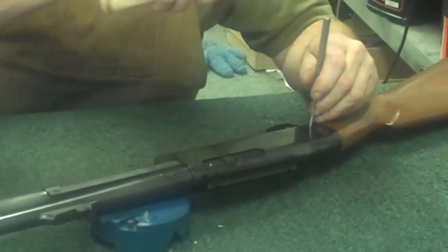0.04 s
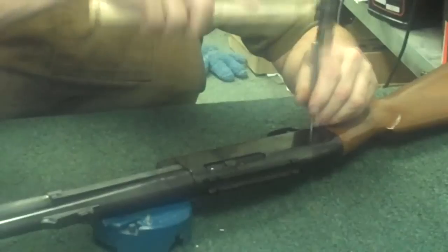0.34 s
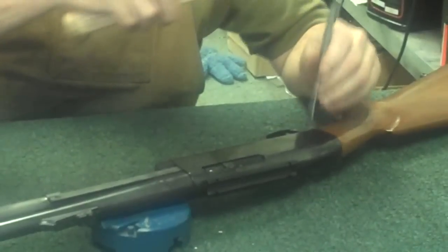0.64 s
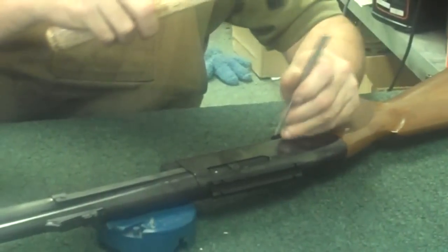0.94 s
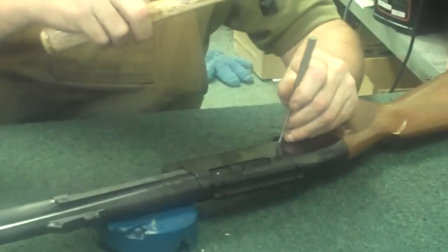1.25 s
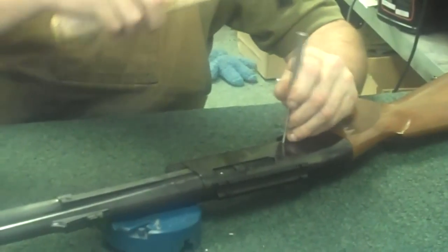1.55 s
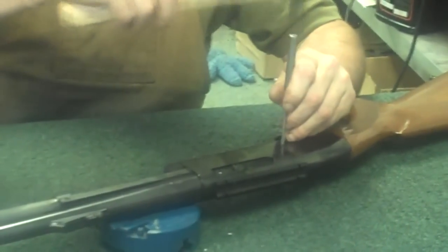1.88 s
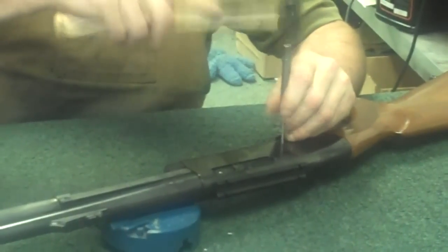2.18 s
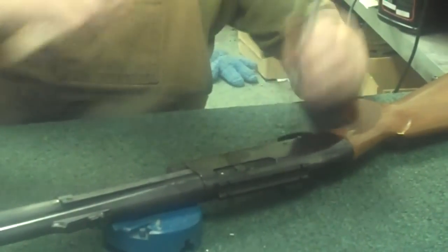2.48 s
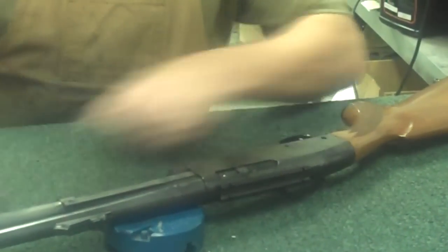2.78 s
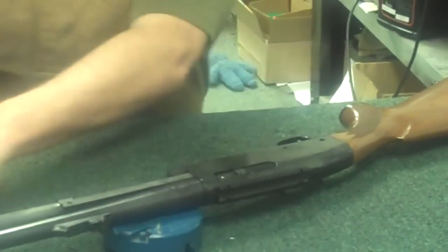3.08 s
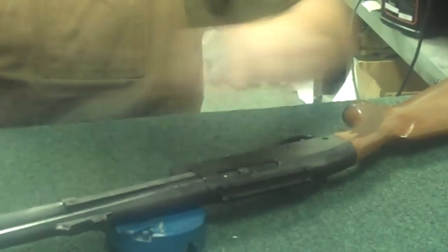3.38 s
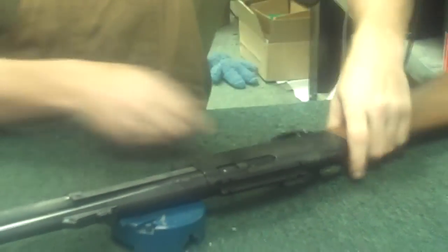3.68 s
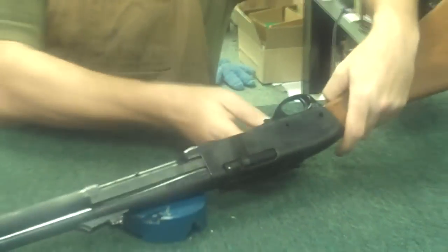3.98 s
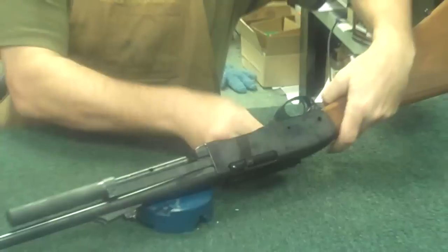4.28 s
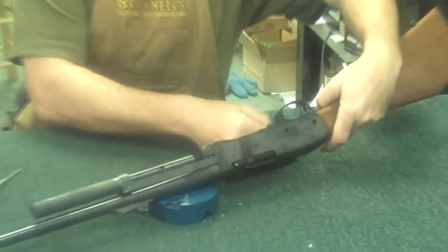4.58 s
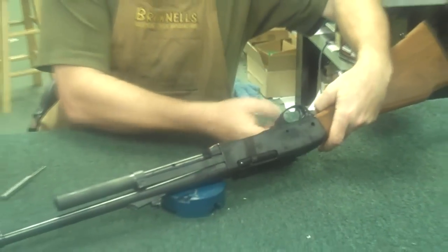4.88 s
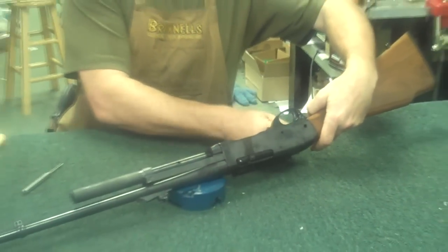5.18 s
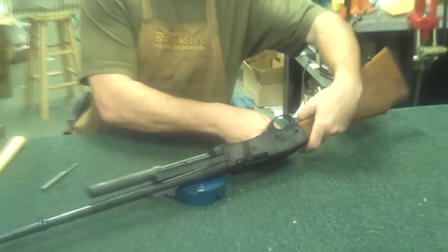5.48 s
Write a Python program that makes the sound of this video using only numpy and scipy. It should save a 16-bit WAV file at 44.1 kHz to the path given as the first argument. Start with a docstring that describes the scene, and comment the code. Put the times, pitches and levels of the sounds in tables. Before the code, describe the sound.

Close, ringing hammer taps on a metal punch, two then three, followed by light clicks from a rifle's loose parts being handled.

```python
"""A padded bench in a small workshop, microphone close to a rifle receiver; sleeves rustle over room noise.
Steel is still ringing as a hammer strikes a punch twice to drive out the pins: each blow knocks the gun,
rebounds and rings the punch. Near 2 s come three more blows, the first setting a loose part chattering.
From about 3 s the gun is lifted: it bumps the pad, its loose action clicks and a catch snaps twice.
Throughout, the camera's gain control ducks at the loud blows and creeps back."""
import sys
import numpy as np
from scipy import signal
from scipy.fft import rfft, irfft, next_fast_len
from scipy.io import wavfile
from scipy.ndimage import uniform_filter1d, map_coordinates

SR = 44100
rng = np.random.default_rng(int(sys.argv[2]) if len(sys.argv) > 2 else 0)


def unload_wav(signal):
    """Save mono or channel-first audio to the path in sys.argv[1] as 16-bit WAV at rate SR, clipped to [-1, 1]."""
    wavfile.write(
        sys.argv[1],
        SR,
        np.round(np.clip(np.atleast_2d(signal).T, -1, 1) * 32767).astype(np.int16),
    )


N = 253134
TIME = np.arange(N) / SR
AGE = np.arange(SR // 2) / SR  # seconds since a contact


def amp(db):
    """Decibels to gain."""
    return 10 ** (np.asarray(db) / 20)


def unit(x):
    """x at rms 1."""
    return x / np.sqrt(np.mean(x ** 2) + 1e-20)


def along(points, hz):
    """Read (freq_hz, value) points on a log frequency axis."""
    freqs, values = np.transpose(points)
    return np.interp(np.log(hz + 1), np.log(freqs), values)


def filtered(x, gain):
    """x times a gain that depends on frequency."""
    size = next_fast_len(len(x) + 8192)
    return irfft(rfft(x, size) * gain(np.fft.rfftfreq(size, 1 / SR)), size)[:len(x)]


def noise(spectrum, size, tilt_db=0):
    """Noise of rms 1 with the given spectrum, tilted by tilt_db per octave above 1 kHz."""
    def gain(hz):
        return amp(along(spectrum, hz) + tilt_db * np.log2(np.maximum(hz / 1000, 1)))
    return unit(filtered(rng.standard_normal(size), gain))


def wobble(rate, size):
    """A smooth random curve with rate knots a second."""
    knots = np.random.default_rng(rng.integers(2 ** 31)).standard_normal(int(size * rate / SR) + 4)
    return map_coordinates(knots, [np.arange(size) * rate / SR])


def fade(t60):
    """A decay that loses 60 dB in t60 seconds."""
    return amp(-60 * AGE / max(t60, 1e-3))


def ring(modes, blur, rate):
    """Decaying modes whose phases wander, as those of parts that chatter against each other."""
    return sum(amp(db) * fade(t60) * np.sin(2 * np.pi * hz * AGE + blur * wobble(rate, len(AGE)))
               for hz, db, t60 in modes)


def add(track, start_s, sound):
    """Mix a sound into the track at start_s."""
    part = track[max(round(start_s * SR), 0):][:len(sound)]
    part += sound[:len(part)]


# Noise of the shop, all around the microphone: freq_hz, level_db
AIR_SPECTRUM = [(20, 6.5), (35, -3.5), (70, -5), (130, -9.5), (200, -3.5), (270, -7.5), (420, -11),
                (700, -8.5), (1400, -10.5), (3000, -18.5), (7000, -26.5), (14000, -32.5)]
# Faint hum in the shop: pitch_hz, level_db
HUM_TONES = [(120, -80.5), (190, -78.5), (362, -79)]


def room_tone(air_db=-65):
    """The workshop at rest: steady noise and a faint, wavering hum."""
    hum = sum(amp(db) * np.sin(2 * np.pi * hz * TIME + wobble(6.1, N)) for hz, db in HUM_TONES)
    return amp(air_db) * noise(AIR_SPECTRUM, N) + hum


# Reverberation of the small shop: freq_hz, t60_s
ROOM_DECAY = [(150, 0.93), (1000, 0.29), (4000, 0.37), (8000, 0.4), (14000, 0.25)]
# Colour of what the walls send back to the microphone: freq_hz, gain_db
WALL_COLOUR = [(80, -18), (190, 6.5), (400, 1), (700, 0.5), (1200, 1), (4000, -4), (10000, -2.5),
               (14000, 1.5)]


def reverberation(x, build_s=0.0078):
    """The walls answer the bench with a diffuse tail that builds up and lasts longest in the bass."""
    hz, t, spectra = signal.stft(rng.standard_normal(len(AGE)), SR, nperseg=256)
    decay = amp(-60 * t / along(ROOM_DECAY, hz)[:, None])
    tail = signal.istft(spectra * decay, SR, nperseg=256)[1][:len(AGE)]
    tail *= 1 - np.exp(-(AGE / build_s) ** 2)
    tail = filtered(tail / np.linalg.norm(tail), lambda f: amp(along(WALL_COLOUR, f)))
    return signal.fftconvolve(x, tail)[:N]


# Arm movements at the bench: middle_s, level_db, half_length_s
ARM_MOVES = [(0, -52.5, 0.23), (0.646, -61, 0.34), (1.45, -72, 0.17), (3.7, -75, 0.28),
             (4.353, -63.5, 0.48), (5.723, -61.5, 0.28)]
# Rustling cloth: freq_hz, level_db
CLOTH_SPECTRUM = [(80, -12), (300, -6), (520, -1), (720, 5), (900, 1.5), (1200, -0.5), (1500, -2),
                  (2000, -8), (4000, -20.5), (9000, -25), (14000, -40)]


def sleeves(flutter_db=0.7):
    """Cloth rustle swells and fades with each arm movement."""
    movement = sum(amp(db) * np.exp(-((TIME - s) / half_s) ** 2) for s, db, half_s in ARM_MOVES)
    flutter = amp(flutter_db * wobble(12, N))
    return movement * flutter * noise(CLOTH_SPECTRUM, N)


# Surfaces scraping, also heard in the clicks and snaps: freq_hz, level_db
SCRAPE_SPECTRUM = [(100, -28.5), (600, -21.5), (1100, -6.5), (2200, -1.5), (2900, -3), (4500, -4.5),
                   (8000, -4), (11000, -7), (14000, -15)]
# Light strokes near the microphone: middle_s, level_db, half_length_s, tilt_db_per_octave
STROKES = [(1.31, -64, 0.009, -6.5), (2.803, -61, 0.015, -2.5), (3.048, -66.5, 0.076, -4.5),
           (3.678, -64.5, 0.015, -5), (4.646, -64, 0.033, -9), (5.351, -59, 0.011, -7),
           (5.591, -40.5, 0.0053, -6), (5.65, -56, 0.011, -7)]


def brushes():
    """Hands and tools brush over cloth and steel in soft strokes that swell and fade."""
    track = np.zeros(N)
    centre_s = AGE[-1] / 2
    for middle_s, db, half_s, tilt_db in STROKES:
        swell = np.exp(-((AGE - centre_s) / half_s) ** 2)
        add(track, middle_s - centre_s, amp(db) * swell * noise(SCRAPE_SPECTRUM, len(AGE), tilt_db))
    return track


# The gun bumping on the pad and its block: start_s, level_db, pitch_hz
PAD_BUMPS = [(2.813, -56, 196), (3.142, -55, 173), (3.821, -49.5, 550), (5.3252, -53, 198),
             (5.6839, -44.5, 588)]


def bumps(t60=0.12, touch_s=0.00094):
    """A soft contact sounds only one low note of the gun."""
    track = np.zeros(N)
    onset = 1 - np.exp(-AGE / touch_s)
    for start_s, db, hz in PAD_BUMPS:
        add(track, start_s, onset * ring([(hz, db, t60)], blur=1.0, rate=100))
    return track


# Modes of the action's thin steel parts: pitch_hz, level_db, t60_s
ACTION_MODES = [(984, -1, 0.14), (1230, -2, 0.11), (1854, -1, 0.15), (1960, -1, .07), (2436, -4.5, 0.046),
                (3300, -1, 0.083), (4530, -13, .07), (5740, -6, 0.063), (7000, -3.5, .1), (7500, -9.5, .08),
                (10300, -15, .08)]


def contact(hz, note_db, tilt_db, scrape_t60=0.037, note_t60=0.05, ring_db=-14, touch_s=0.0007):
    """Steel meets steel: a short scrape, the note of the part hit and a little ring of the action."""
    scrape = noise(SCRAPE_SPECTRUM, len(AGE), tilt_db) * fade(scrape_t60)
    note = ring([(hz, note_db, note_t60)], blur=0.75, rate=87) * (1 - np.exp(-AGE / touch_s))
    lowest_hz = ACTION_MODES[0][0]
    tilted_modes = [(f, db + tilt_db * np.log2(f / lowest_hz) / 2, t60) for f, db, t60 in ACTION_MODES]
    return scrape + note + amp(ring_db) * ring(tilted_modes, blur=3.2, rate=110)


def chatter(start_s=1.8396, gap_s=0.0118, count=4, first_db=-28, loss_db=2.1):
    """A part shaken loose by the hammer bounces a few times, ever weaker."""
    track = np.zeros(N)
    for k in range(count):
        bounce = contact(hz=958, note_db=8, tilt_db=-7.5, scrape_t60=0.043)
        add(track, start_s + k * gap_s, amp(first_db - k * loss_db) * bounce)
    return track


# Loose parts touching, close by: start_s, level_db, pitch_hz, note_db, tilt_db_per_octave
ACTION_CLICKS = [(3.4648, -53, 5200, -12, -5.5), (3.8781, -54.5, 3475, -5, -4),
                 (4.3221, -39.5, 1980, 0.5, -3), (4.392, -36, 946, -7, 1.5), (4.514, -57, 4320, -1, -5),
                 (5.3242, -45.5, 1214, -5, -4.5), (5.5659, -36.5, 1160, -2.5, 2),
                 (5.5994, -35, 1365, -11, 2), (5.684, -43.5, 1675, 0.5, -4.5)]


def loose_action(settle_s=0.0045, settle_db=-8.5, settle_tilt_db=-6.5):
    """Each loose part clicks against its neighbour and settles with a softer, duller touch."""
    track = np.zeros(N)
    for start_s, db, hz, note_db, tilt_db in ACTION_CLICKS:
        add(track, start_s, amp(db) * contact(hz, note_db, tilt_db))
        settling = contact(hz, note_db, tilt_db + settle_tilt_db)
        add(track, start_s + settle_s, amp(db + settle_db) * settling)
    return track


# A spring catch snapping over, close by: start_s, level_db
CATCH_SNAPS = [(3.8271, -34), (5.6339, -31.5)]


def spring_catch(hz=3150, rise_s=0.00071, scrape_db=-16, scrape_t60=0.064):
    """The catch gives a tick only a few cycles long, with a faint scrape behind it."""
    track = np.zeros(N)
    rise = (AGE / rise_s) ** 2
    tick = rise * np.exp(1 - rise) * np.sin(2 * np.pi * hz * AGE)
    for start_s, db in CATCH_SNAPS:
        scrape = noise(SCRAPE_SPECTRUM, len(AGE), tilt_db=-3) * fade(scrape_t60)
        add(track, start_s, amp(db) * (tick + amp(scrape_db) * scrape))
    return track


# Ringing of the struck steel, plus a thin resonance near 13.8 kHz: centre_hz, width_hz, level_db
RING_CLUSTERS = [(960, 160, -3), (1380, 330, 0), (2000, 450, -6), (3580, 350, 1), (3950, 300, -2),
                 (5000, 200, -5), (6040, 220, 5), (8500, 600, -3), (11700, 1500, -12), (8030, 170, 4),
                 (13850, 240, 8)]
# Clear partials of that ringing, the last at the same thin resonance: pitch_hz, level_db, t60_s
RING_PARTIALS = [(3584, -4, .25), (5985, 0, .25), (8028, -5, .36), (13885, -1, .28)]


def blow_ring(t60=0.18, partials_db=-15):
    """Steel rings in dense clusters and clear partials; the microphone resonates near 13.8 kHz."""
    def clusters(f):
        return np.sqrt(sum(amp(db) ** 2 / (1 + (2 * (f - hz) / width) ** 2) ** 2
                           for hz, width, db in RING_CLUSTERS))
    shimmer = unit(filtered(rng.standard_normal(len(AGE)), clusters))
    return shimmer * fade(t60) + amp(partials_db) * ring(RING_PARTIALS, blur=0.8, rate=140)


# Hammer meeting punch, at close range: freq_hz, level_db
CRACK_SPECTRUM = [(200, -9.5), (700, -7.5), (1600, 0), (2800, 1), (3600, 5), (4400, 1.5), (6000, 2),
                  (7200, -2.5), (8300, 1.5), (10000, -5), (12000, -4.5), (13700, -8.5)]


def steel_crack(t60=0.086, swell_s=0.00039):
    """The impact gives a bright burst of noise that dies quickly."""
    return noise(CRACK_SPECTRUM, len(AGE)) * fade(t60) * (1 - np.exp(-AGE / swell_s))


def dying_blow(db=-35, ring_db=-3, receiver_db=-9, t60=0.34):
    """At the start the steel, the receiver and the room still ring from the blow before."""
    track = np.zeros(N)
    receiver = ring([(172, 3.0, t60), (2046, 9.5, 0.18), (4150, -5, 0.25)], blur=1.0, rate=150)
    crack_tail = noise(CRACK_SPECTRUM, len(AGE)) * fade(t60)
    add(track, 0, amp(db) * (crack_tail + amp(ring_db) * blow_ring() + amp(receiver_db) * receiver))
    return track


# A pin sliding in its hole: freq_hz, level_db
GRIND_SPECTRUM = [(40, -13.5), (300, 1), (800, -22.5), (1250, 2), (1900, -4.5), (2800, -12.5), (6000, -21),
                  (14000, -28)]


def pin_grind(weight, slide_s, travel):
    """The pin grinds for some milliseconds and sticks; longer travel spreads the same energy thinner."""
    sliding = np.exp(-(AGE / slide_s) ** 6) / np.sqrt(travel)
    return sliding * noise([(hz, db + along(weight, hz)) for hz, db in GRIND_SPECTRUM], len(AGE))


# Modes of the gun lying on its block: pitch_hz, level_db, t60_s
GUN_MODES = [(125, -12, 0.036), (220, -12, 0.017), (380, -12.5, 0.037), (598, -6, 0.024), (840, -6, 0.023),
             (939, -6.5, 0.037), (1110, -2.5, .012), (1233, -11, 0.024), (1400, -6.5, 0.0029),
             (1583, -11, 0.035), (1940, -10, 0.025), (2140, -14, 0.045), (2330, -19.5, .03)]


def gun_knock(weight):
    """The gun's short-lived modes start with alternating signs and add up to a dull knock."""
    return sum(-(-1) ** k * amp(db + along(weight, hz)) * fade(t60) * np.sin(2 * np.pi * hz * AGE)
               for k, (hz, db, t60) in enumerate(GUN_MODES))


# Hammer blows close to the microphone: start_s, level_db, thump_db, hollow_db, slide_s, crack_db
HAMMER_BLOWS = [(0.1485, -11.5, -3.5, 3.5, 0.009, -4), (0.3630, -5.5, 0, 1.5, 0.014, -9),
                (1.8338, -9.5, -2.5, -2, 0.0061, -8.5), (2.0284, -4, 2.5, 2.5, 0.0105, -4.5),
                (2.2233, -8, 3.5, -7.5, 0.0066, -5.5)]


def hammer(rebound_db=-9, push_db=-16.5, grind_db=-6, ring_db=-15.5,
           rebound_share=0.42, push_s=0.00092, typical_slide_s=0.0098):
    """Each blow drives the pin on; returns the gun's dull knocks and the bright crack and ring."""
    knocks, bright = np.zeros(N), np.zeros(N)
    for start_s, db, thump_db, hollow_db, slide_s, crack_db in HAMMER_BLOWS:
        # how firmly the pin resists decides how much of the blow reaches the gun's low modes
        weight = [(200, thump_db), (650, hollow_db), (1600, 0)]  # freq_hz, gain_db
        knock = gun_knock(weight)
        add(knocks, start_s, amp(db) * knock)
        # the hammer lands again partway through the pin's slide
        add(knocks, start_s + rebound_share * slide_s, amp(db + rebound_db) * knock)
        # the gun sinks into the pad: one low push of air, stronger the further the pin travels
        travel = slide_s / typical_slide_s
        push = -travel * AGE / push_s * np.exp(1 - AGE / push_s)
        add(knocks, start_s, amp(db + push_db) * push)
        add(knocks, start_s, amp(db + grind_db) * pin_grind(weight, slide_s, travel))
        add(bright, start_s, amp(db + crack_db) * steel_crack() + amp(db + ring_db) * blow_ring())
    return knocks, bright


def scene():
    """One microphone at the bench: blows and clicks close by, with the room behind them."""
    knocks, bright = hammer()
    handling = loose_action() + chatter() + spring_catch() + bumps() + brushes()
    # the slim gun radiates its low modes to the nearby microphone, hardly to the walls
    radiated = filtered(knocks, lambda hz: hz ** 2 / (hz ** 2 + 900 ** 2))
    room = reverberation(amp(-22) * radiated + amp(-14) * bright + amp(-11.5) * handling)
    return (knocks + bright + handling + dying_blow() + room + room_tone() + sleeves())[None]


def record(dry, limit_db=-21, release_db_per_s=10, start_cut_db=12, top_hz=14130):
    """Behind the microphone, gain control cuts peaks at once and recovers slowly; then a band limit."""
    mic = dry[0]
    level_db = 10 * np.log10(np.abs(uniform_filter1d(mic ** 2, size=220)) + 1e-12)
    excess_db = np.maximum(level_db - limit_db, 0)
    recovery_db = release_db_per_s * TIME
    # the gain starts out still down from earlier hammering
    cut_db = np.maximum.accumulate(np.maximum(excess_db + recovery_db, start_cut_db)) - recovery_db
    ducked = mic * amp(-uniform_filter1d(cut_db, size=44))
    return filtered(ducked, lambda hz: 1 / np.sqrt(1 + (hz / top_hz) ** 150))[None]


dry = scene()
out = record(dry)
unload_wav(out)
```